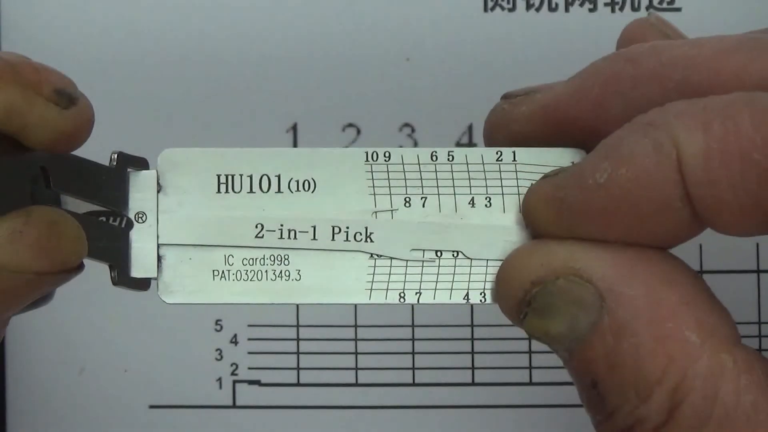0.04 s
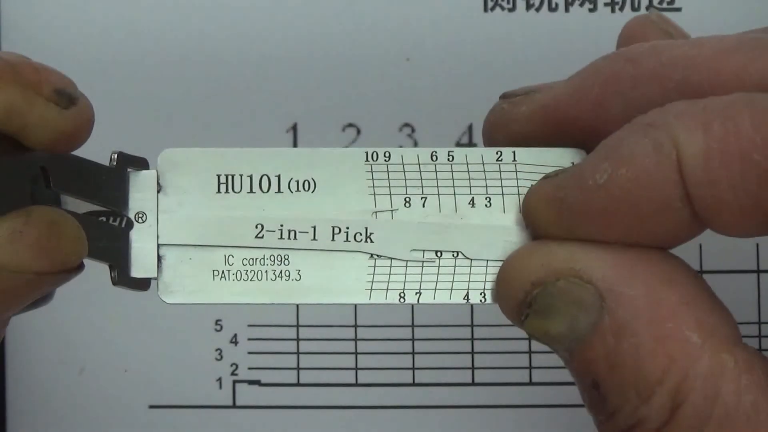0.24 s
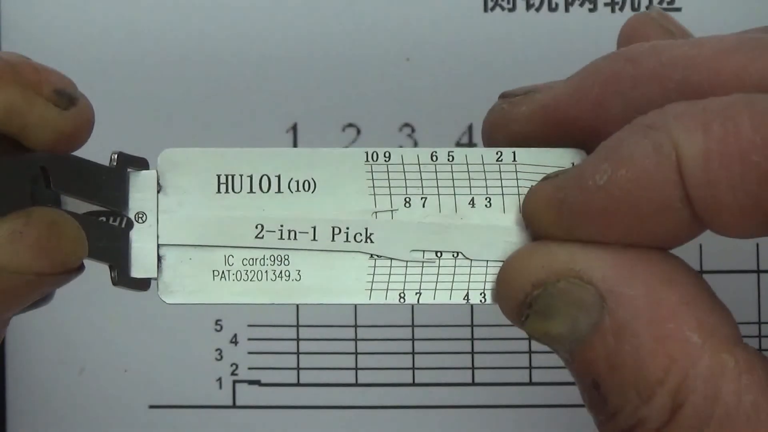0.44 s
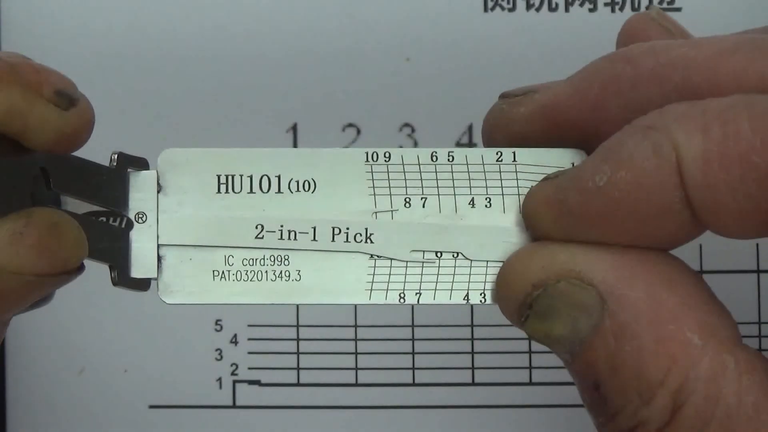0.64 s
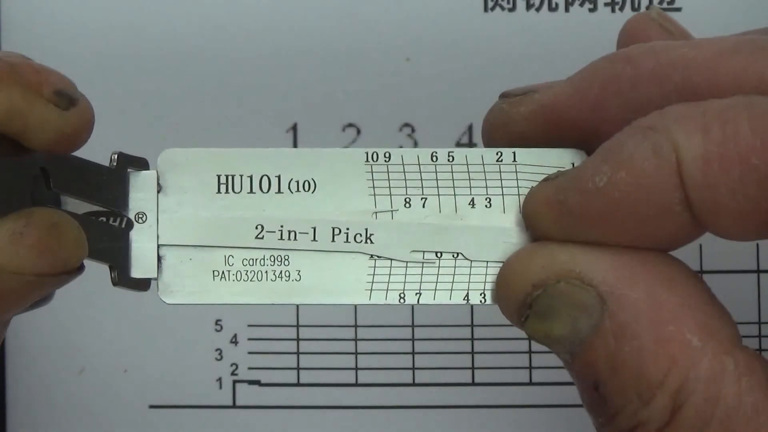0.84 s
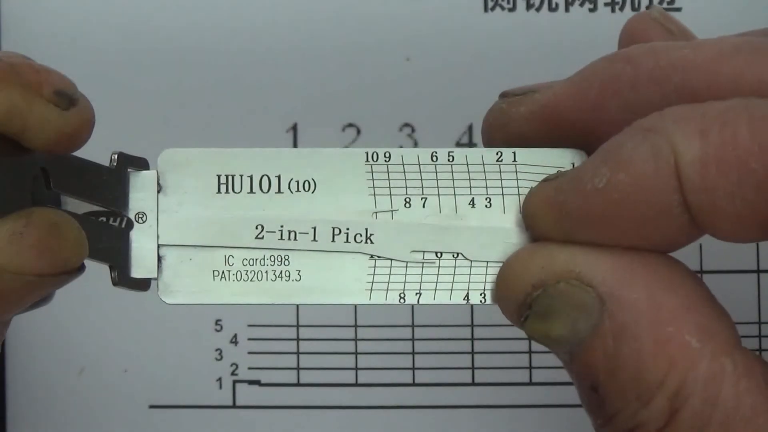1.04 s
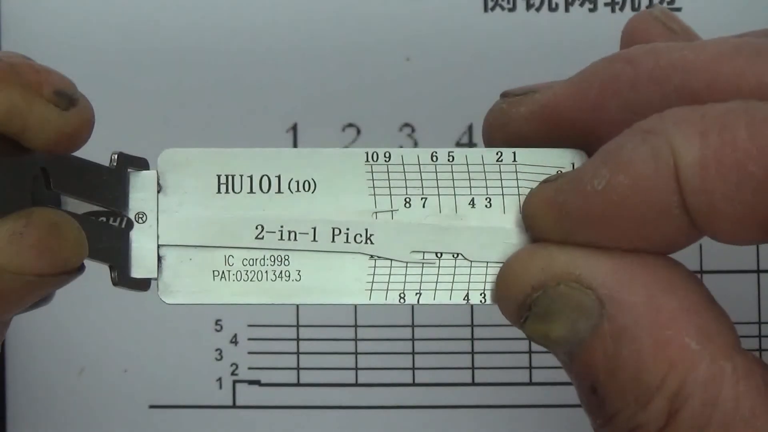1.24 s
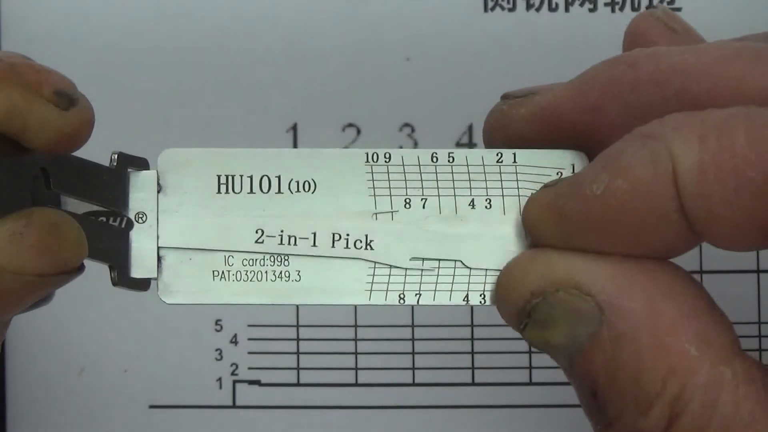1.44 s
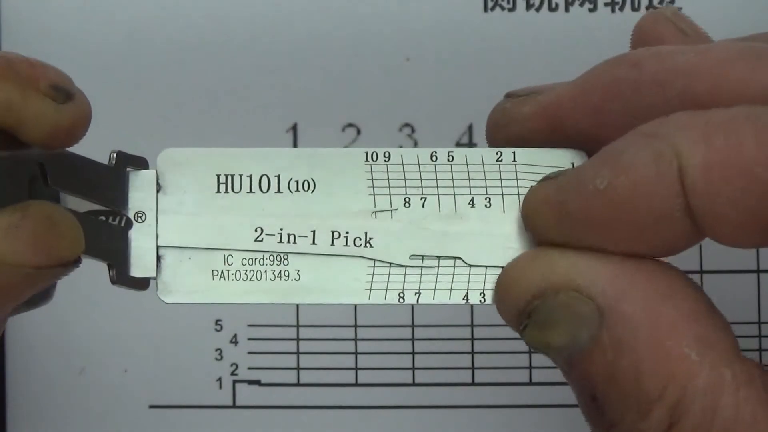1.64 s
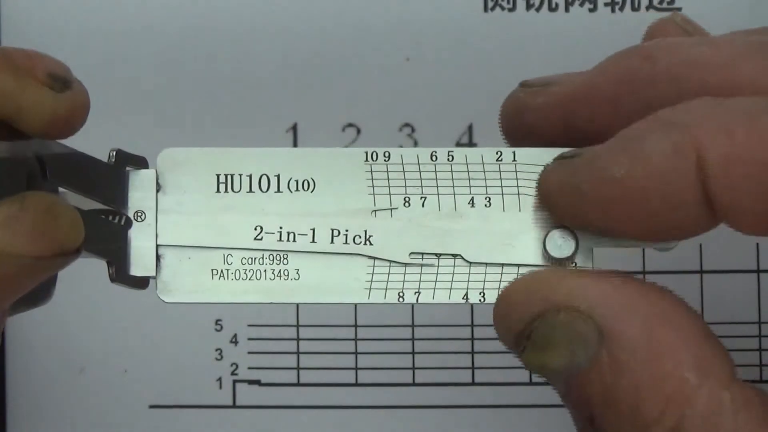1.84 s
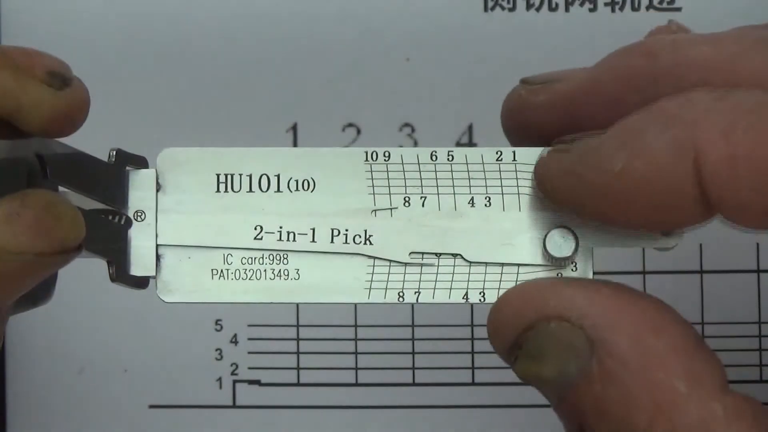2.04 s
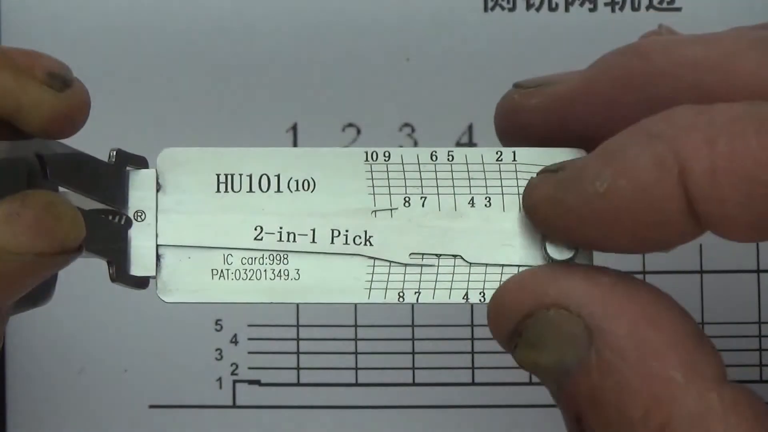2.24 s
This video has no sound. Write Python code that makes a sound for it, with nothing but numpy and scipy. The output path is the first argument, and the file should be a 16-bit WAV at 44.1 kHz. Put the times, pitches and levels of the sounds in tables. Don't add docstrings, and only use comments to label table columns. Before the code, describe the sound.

A sharp, bright metallic snap of a lock pick at about 1.45 seconds, after a very brief faint scrape, rebounds for under a tenth of a second with ringing steel and dull housing knocks. A faint tick comes near 1.8, a lighter lever click at 2.17. Steady microphone hiss, low room air and a faint motor whine lie underneath, dipping and dulling briefly after each click. Close, dry, slightly left.

```python
import sys
import numpy as np
from scipy import signal
from scipy.fft import rfft, irfft, next_fast_len
from scipy.io import wavfile
from scipy.ndimage import map_coordinates

SR = 44100
rng = np.random.default_rng(int(sys.argv[2]) if len(sys.argv) > 2 else 0)


def rack_gain(trim_db):
    fader = np.asarray(trim_db, float)
    return 10 ** (fader / 20)


def persist_wave(psi):
    counts = np.round(np.clip(psi, -1, 1) * 32767).astype(np.int16)
    wavfile.write(sys.argv[1], SR, np.atleast_2d(counts).T)


N = 101871

# f/Hz, density/dB per Hz
AIR_SPECTRUM = [(15, -41.5), (25, -7), (189, -7.5), (415, -5.5), (582, -9), (1140, -6.5), (1510, -16.5),
                (2200, -26), (2860, -43), (4840, -120)]
# f/Hz, width/Hz, level/dB
AIR_PEAKS = [(66, 15, -4.5), (118.1, 18, -2.5), (170, 13.3, 1), (215.6, 72, -4.5), (267.1, 10.1, -1),
             (297.5, 24, -7.5), (345, 30, -7), (419.5, 30, -4.5), (497.4, 10, -2.5), (800, 140, -15),
             (1042, 56, -5), (1142.6, 27.5, 0), (1267, 110, -14.5)]
# f/Hz, density/dB per Hz
HISS_SPECTRUM = [(900, -13), (1500, 3.5), (4200, -1), (5000, -10.5), (5700, -1.5), (8100, -1), (10500, -12),
                 (11500, -59)]
# f/Hz, likeness/1
LIKENESS = [(25, .1), (60, 0.16), (200, 0.95), (1000, 0.77), (2000, 0.6), (4500, 1), (5500, 0.2),
            (9000, 0.33)]
# f/Hz, level/dB
LEAN = [(40, 5), (200, 3.5), (600, 7), (1100, 4.5), (2000, 4), (4000, 8.5), (6000, 6.5), (10000, 6)]
# order/1, level/dB
MOTOR_ORDERS = [(6, -71.5), (7, -81), (8, -70), (9, -67), (10, -73.5), (11, -82.5), (17, -80)]
# f/Hz, t60/s
DESK_DECAY = [(200, 0.22), (1000, 0.13), (4000, 0.04), (10000, 0.027)]
# f/Hz, level/dB
PORT = [(100, 0), (11000, 0), (12500, -8), (15500, -16), (17500, -45)]
# f/Hz, level/dB
CRACK = [(1500, -28), (3500, -17), (4700, -33), (5400, 1.5), (8000, -4), (10500, -24), (12000, -30),
         (16500, -50)]
# f/Hz, level/dB, t60/s
HOUSING = [(158.8, 0.5, .3), (397, 0.5, .06), (265, 0, .15), (473, -1.5, .1), (557, 9, 0.048),
           (726, 2.5, 0.08), (775, 3.5, 0.047), (914, 0, .08), (950, 2.5, 0.054), (1006, 0, .09),
           (1250, -20.5, 0.12), (1600, 7, .04)]
# f/Hz, level/dB, t60/s
BLADE = [(1460, -22, .06), (2331, 2, 0.062), (3380, -8, 0.059), (4150, -3, 0.06), (5500, 5, 0.012),
         (1880, -14, .08), (3010, -12, .1), (6230, -20, 0.091), (6390, -30, 0.054), (7240, 3, 0.025),
         (7750, -16, 0.068), (7967, -16, .05), (8840, -16, 0.021), (10400, -34, .04)]
# f/Hz, level/dB, t60/s
WAFER = [(1480, -2, .07), (2261, -10.5, 0.047), (2580, -18.5, 0.18), (3273, -0.5, 0.036), (4210, -3.5, .02),
         (5374, -5, .03), (5600, -11, 0.18), (5860, -20, 0.14), (6330, -2.5, 0.033), (7280, -2, 0.04),
         (8100, -6, 0.03), (8950, -1, 0.03), (9340, -7.5, 0.028), (9850, 3, 0.016)]
# f/Hz, level/dB, t60/s
WAFER_MORE = [(7040, -18, .06), (7550, -10, .06), (7833, -4, .05), (8420, -2, .04), (10060, 2, .025)]
# t/s, crack level/dB, ring level/dB, favoured f/Hz, reach/octaves
TOUCHES = [
    (1.8258, -50, -52, 6000, 0.3),
    (0.9355, -72, -38, 1150, 0.16),
    (1.97, -78, -49.5, 810, 0.16),
    (2.235, -80, -42, 250, .25),
]
# t/s, crack level/dB, ring level/dB, favoured f/Hz, reach/octaves
LEVER = [
    (2.1697, -19.5, -25.5, 5770, 0.9),
    (2.1712, -35, -35.5, 800, 0.21),
    (2.1730, -41, -35, 5400, 0.97),
    (2.1752, -50, -35.5, 835, 0.16),
    (2.1815, -61, -40.5, 574, 0.34),
    (2.1935, -55, -42, 3000, .7),
    (2.1985, -55, -49, 800, 0.24),
]
# t/s, crack level/dB, ring level/dB, favoured f/Hz, reach/octaves
SNAP = [(1.4554, -10.5, -23.5, 6280, 0.85), (1.4543, -40, -31, 7500, .3), (1.4569, -30, -29, 7500, .3),
        (1.4575, -57, -31, 1050, 0.4), (1.4612, -49.5, -24, 4770, 1), (1.4675, -47.5, -23.5, 722, 0.067),
        (1.4700, -34.5, -24.5, 5600, 0.36), (1.4630, -51.5, -29, 3260, 0.33), (1.4710, -59, -23, 3300, 0.2),
        (1.4670, -60, -32, 8950, .08), (1.4720, -60, -29, 7900, .1), (1.4660, -60, -33, 1560, .15),
        (1.4721, -53.5, -21, 443, 0.26), (1.4815, -55, -32.5, 930, 0.27), (1.4840, -45, -29, 6600, 0.3),
        (1.4850, -60, -29, 8420, .08), (1.4940, -63.5, -31, 680, 0.21), (1.4560, -69, -43, 157, .3),
        (1.5100, -70, -37, 159, .3), (1.5150, -58.5, -46, 506, 0.26), (1.5310, -73, -38, 420, 0.4)]
# f/Hz, share lost in mid/1, share lost in side/1
FLICKER = [(1100, 0, 0), (1600, .03, .5), (3000, .2, .75), (4300, .5, .85), (4550, .92, .97),
           (5350, .96, .97), (5520, .02, .05), (9200, .03, .1), (9700, .6, .7), (10200, .93, .97)]
# start t/s, end t/s, low f/Hz, high f/Hz
DROPOUTS = [(1.39, 1.452, 13000, 22000), (1.444, 1.449, 8500, 11500), (1.458, 1.5, 12400, 22000),
            (1.468, 1.5, 10600, 22000), (1.476, 1.5, 9100, 22000), (1.471, 1.5, 1950, 2450),
            (1.481, 1.5, 1900, 3000), (1.471, 1.5, 3750, 5000), (1.492, 1.5, 8200, 22000),
            (1.4955, 1.627, 1450, 22000), (1.513, 1.582, 1150, 1600), (1.62, 1.672, 2900, 5300),
            (1.62, 1.66, 9000, 16000), (2.247, 2.272, 1650, 3750), (2.25, 2.268, 6200, 6900),
            (2.235, 2.31, 4500, 5400), (2.205, 2.27, 8900, 22000), (2.27, 2.31, 9300, 22000),
            (2.14, 2.215, 11200, 22000), (2.18, 2.215, 10500, 22000)]
# start t/s, end t/s, low f/Hz, high f/Hz
SPARED = [
    (1.509, 1.57, 5250, 6200),
    (1.585, 1.63, 7000, 7700),
]

AIR_DB, PEAKS_DB, HISS_DB = -62.5, -58.5, -65
MOTOR_HZ, MOTOR_DRIFT, MOTOR_FLUTTER_DB = 128.6, .0008, 3
LEFT_DB, LEVER_LEFT_DB, DESK_DB, LAG_S = 3.4, 1.2, -8.5, 1.5e-5
RISE_CYCLES, THUD_DB, THUD_CYCLES = .4, 4, 6
ROUGH_RAD, ROUGH_PER_S = .8, 150
SIZZLE_DB, SIZZLE_T60_S = -30.5, 0.12
SCRAPE_START_S, SCRAPE_RISE_S, SCRAPE_DB, SCRAPE_EDGE_HZ = 1.412, .03, -57, 3500
SNAP_S = SNAP[0][0]
FLICKER_S, FLICKER_BAND_HZ, QUIET_DB, LOST_DB = .06, 129, 5, -60
DUCK_S, DUCK_DB, DUCK_BACK_S = 1.3, -2, 0.94
SIDES = np.array([[1], [-1]])


def unit(x):
    return x / np.sqrt(np.mean(x ** 2) + 1e-20)


def along(points, hz):
    f, v = np.transpose(points)
    return np.interp(np.log(hz + 1), np.log(f + 1), v)


def wobble(rate_hz):
    knots = rng.standard_normal(int(N * rate_hz / SR) + 4)
    return map_coordinates(knots, [np.arange(N) * rate_hz / SR])


def filtered(x, response):
    n = x.shape[-1]
    m = next_fast_len(n + 8192)
    return irfft(rfft(x, m) * response(np.fft.rfftfreq(m, 1 / SR)), m)[..., :n]


def rush(gain):
    def mid_side_gain(hz):
        turn_rad = np.arccos(np.clip(along(LIKENESS, hz), -1, 1)) / 2
        return gain(hz) * np.array([np.cos(turn_rad), np.sin(turn_rad)])

    mid, side = filtered(rng.standard_normal((2, N)), mid_side_gain)
    stereo = np.array([mid + side, mid - side])
    return unit(filtered(stereo, lambda hz: rack_gain(along(LEAN, hz) * SIDES / 2)))


def microphone_hiss():
    return rack_gain(HISS_DB) * rush(lambda hz: rack_gain(along(HISS_SPECTRUM, hz)))


def room_air():
    def peaks(hz):
        power = sum(rack_gain(2 * db) / (1 + (2 * (hz - centre) / width) ** 4) for centre, width, db in AIR_PEAKS)
        return np.sqrt(power)

    broad = rack_gain(AIR_DB) * rush(lambda hz: rack_gain(along(AIR_SPECTRUM, hz)))
    narrow = rack_gain(PEAKS_DB) * rush(peaks)
    return (broad + narrow) * rack_gain(0.88 * wobble(1.4))


def motor():
    phase = 2 * np.pi * MOTOR_HZ * np.cumsum(1 + MOTOR_DRIFT * wobble(3.14)) / SR
    whine = np.zeros(N)
    for order, db in MOTOR_ORDERS:
        level = rack_gain(db + 1.5 + MOTOR_FLUTTER_DB * wobble(8.3))
        whine += level * np.sin(np.round(order) * phase + rng.uniform(0, 2 * np.pi))
    return whine * rack_gain(2.2 * SIDES)


def desk(x):
    hz, t, z = signal.stft(rng.standard_normal((2, SR // 2)), SR, nperseg=256)
    decay = rack_gain(-60 * t / along(DESK_DECAY, hz)[:, None])
    tail = signal.istft(z * decay, SR, nperseg=256)[1]
    return signal.fftconvolve(x[None], tail / np.linalg.norm(tail[0]), axes=1)[:, :N]


def ring(modes, t, tone_hz, reach):
    hz, db, t60 = np.transpose(modes)[..., None]
    knots = rng.standard_normal((len(modes), int(t[-1] * ROUGH_PER_S) + 2))
    drift = np.array([np.interp(t * ROUGH_PER_S, np.arange(len(k)), k - k[0]) for k in knots])
    loose = ROUGH_RAD * drift * (hz > 2000)
    detuning_db = -6 * (np.log2(hz / tone_hz) / reach) ** 2
    level_db = db + detuning_db + 2 * knots[:, :1] - 60 * t / t60
    near = level_db[:, 0] > -60
    hz, level_db, loose = hz[near], level_db[near], loose[near]
    rise = 1 - np.exp(-t * hz / RISE_CYCLES)
    return np.sum(rack_gain(level_db) * np.sin(2 * np.pi * hz * t + loose) * rise, axis=0)


def contacts(rows, steel):
    out, blows = np.zeros(N + SR), np.zeros(N)
    t = np.arange(SR // 4) / SR
    for s, crack_db, ring_db, tone_hz, reach in rows:
        start = round(s * SR)
        grit = unit(filtered(rng.standard_normal(len(t)), lambda hz: rack_gain(0.45 * along(CRACK, hz))))
        sizzle = rack_gain(crack_db + SIZZLE_DB - 60 * t / SIZZLE_T60_S) * grit
        thud = ring([(tone_hz, THUD_DB, THUD_CYCLES / tone_hz)], t, tone_hz, reach)
        body = ring(steel + HOUSING, t, tone_hz, reach) + thud
        out[start:start + len(t)] += rack_gain(ring_db - 9) * body + sizzle
        blows[start] += rack_gain(crack_db + 16.5)
    crack = filtered(blows, lambda hz: 1j * rack_gain(along(CRACK, hz)))
    return out[:N] + crack


def tool_touches():
    return contacts(TOUCHES, WAFER)


def scrape():
    before_s = SNAP_S - np.arange(N) / SR
    grit = unit(filtered(rng.standard_normal(N), lambda hz: hz ** 2 / (hz ** 2 + SCRAPE_EDGE_HZ ** 2)))
    active = (before_s > 0) & (before_s < SNAP_S - SCRAPE_START_S)
    return rack_gain(SCRAPE_DB) * grit * np.exp(-np.abs(before_s) / SCRAPE_RISE_S) * active


def lever_click():
    return contacts(LEVER, BLADE) * rack_gain(LEVER_LEFT_DB * SIDES)


def wafer_snap():
    return contacts(SNAP, WAFER + WAFER_MORE)


def scene():
    lock = wafer_snap() + tool_touches() + scrape() + lever_click()
    lock = lock + rack_gain(DESK_DB) * desk(lock.mean(axis=0))

    def to_ports(hz):
        lag = np.exp(1j * np.pi * hz * LAG_S * SIDES)
        return rack_gain(along(PORT, hz) + LEFT_DB * SIDES) * lag

    return filtered(lock, to_ports) + motor() + room_air() + microphone_hiss()


def flickered(x):
    mid_side = np.array([x[0] + x[1], x[0] - x[1]]) / 2
    hz, t, z = signal.stft(mid_side, SR, nperseg=1024, noverlap=768)
    band = (hz / FLICKER_BAND_HZ).astype(int)
    bands = band.max() + 1
    shifts = rng.random((2, bands, 1))
    luck = rng.random((2, bands, int(t[-1] / FLICKER_S) + 2))
    luck = np.take_along_axis(luck, (t / FLICKER_S + shifts).astype(int), axis=2)[:, band]
    f, *shares = np.transpose(FLICKER)
    band_hz = FLICKER_BAND_HZ * (band + .5)
    share = np.array([np.interp(band_hz, f, s) for s in shares])[..., None]
    power = np.sum(np.abs(z[0, band > 10]) ** 2, axis=0)
    quiet = power < np.median(power) * rack_gain(2 * QUIET_DB)
    quiet &= (t < SCRAPE_START_S) | (t > SNAP_S)
    kept = z * rack_gain(LOST_DB * ((luck < share) & quiet))
    mid, side = signal.istft(kept, SR, nperseg=1024, noverlap=768)[1][:, :N]
    return np.array([mid + side, mid - side])


def starved(x):
    hz, t, z = signal.stft(x, SR, nperseg=256, noverlap=192)

    def inside(rows):
        hits = np.zeros((len(hz), len(t)), bool)
        for start, end, low, high in rows:
            hits |= (t > start) & (t < end) & (hz[:, None] > low) & (hz[:, None] < high)
        return hits

    lost = inside(DROPOUTS) & ~inside(SPARED)
    return signal.istft(z * rack_gain(LOST_DB * lost), SR, nperseg=256, noverlap=192)[1][:, :N]


def low_pass(x):
    return signal.sosfilt(signal.butter(12, 17500, fs=SR, output="sos"), x)


def record(dry):
    since_s = np.arange(N) / SR - DUCK_S
    ducked = dry * rack_gain(DUCK_DB * (since_s > 0) * np.exp(-np.abs(since_s) / DUCK_BACK_S))
    mix = starved(flickered(ducked))
    return low_pass(mix)


dry = scene()
out = record(dry)
persist_wave(out)
```